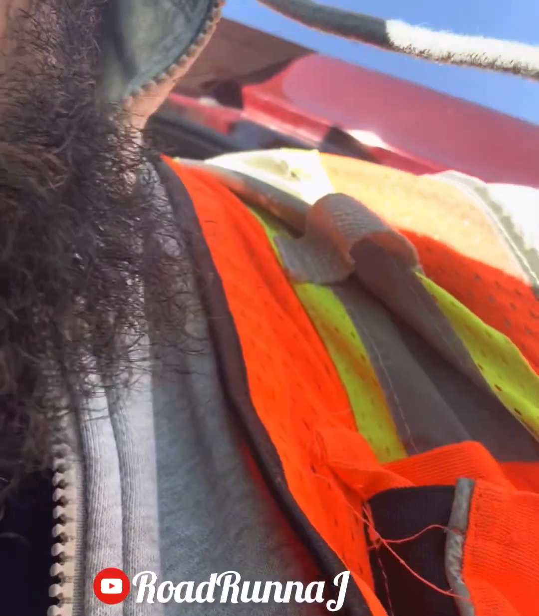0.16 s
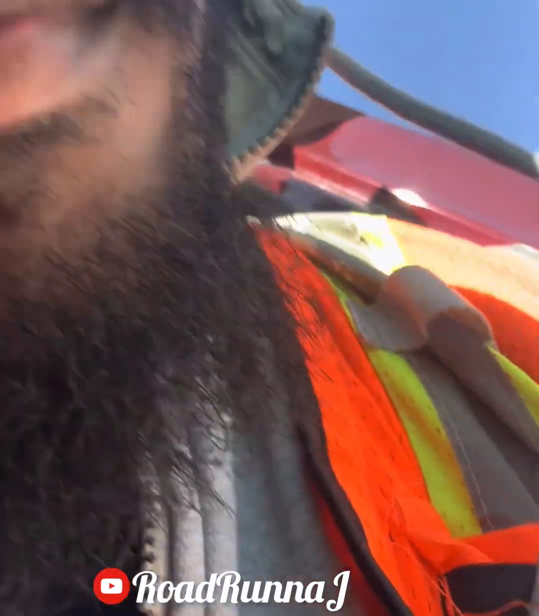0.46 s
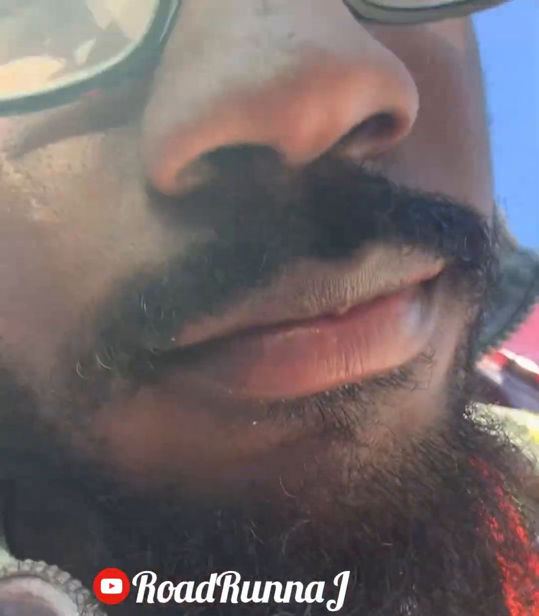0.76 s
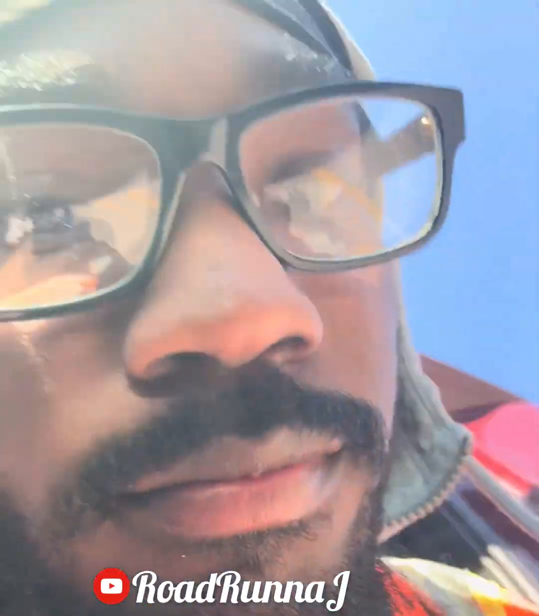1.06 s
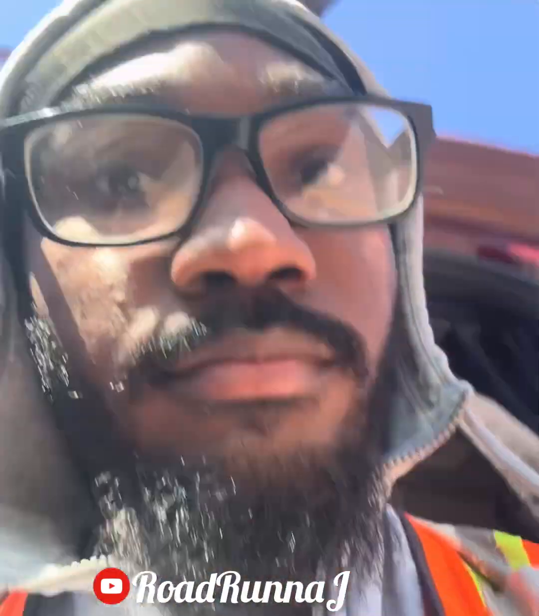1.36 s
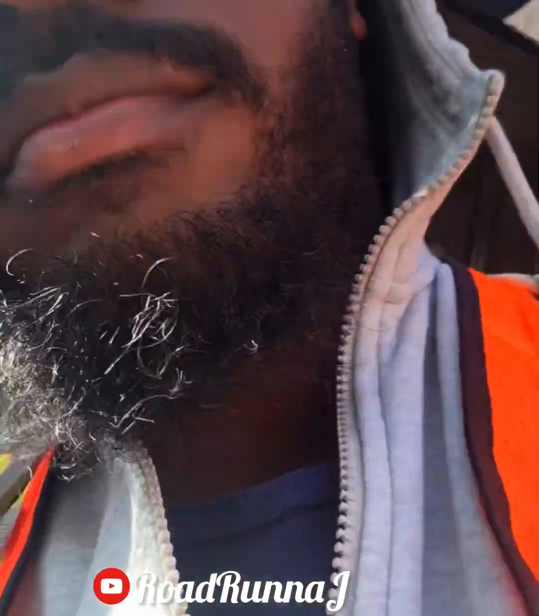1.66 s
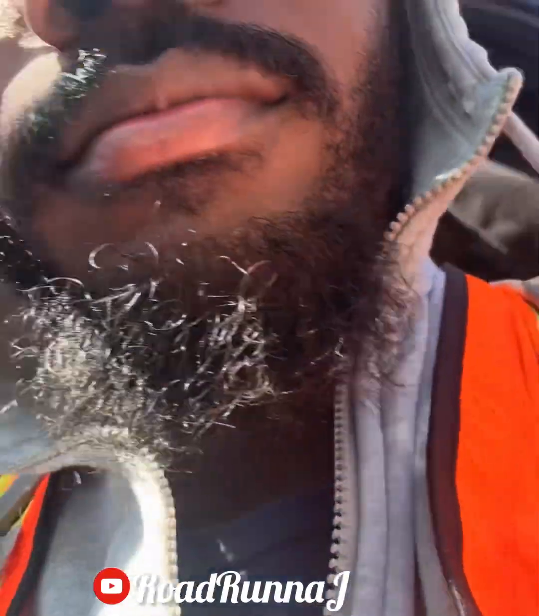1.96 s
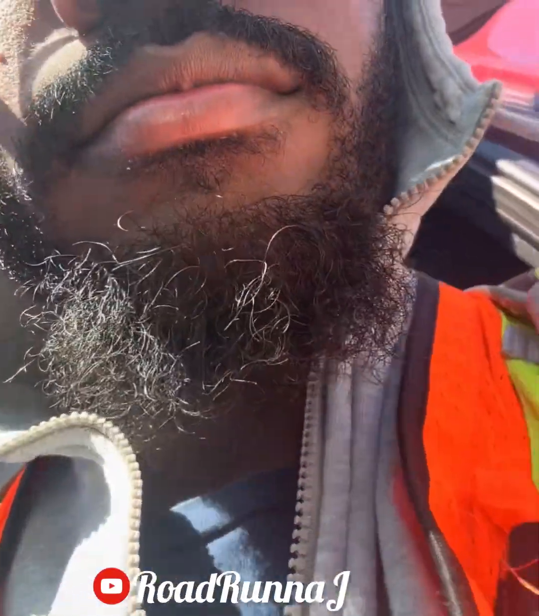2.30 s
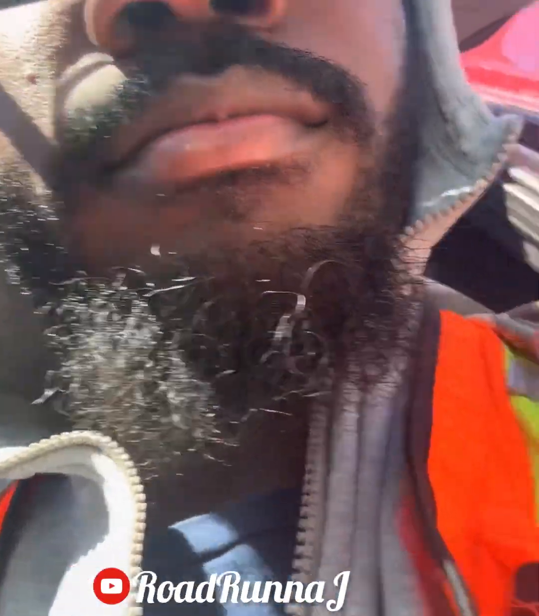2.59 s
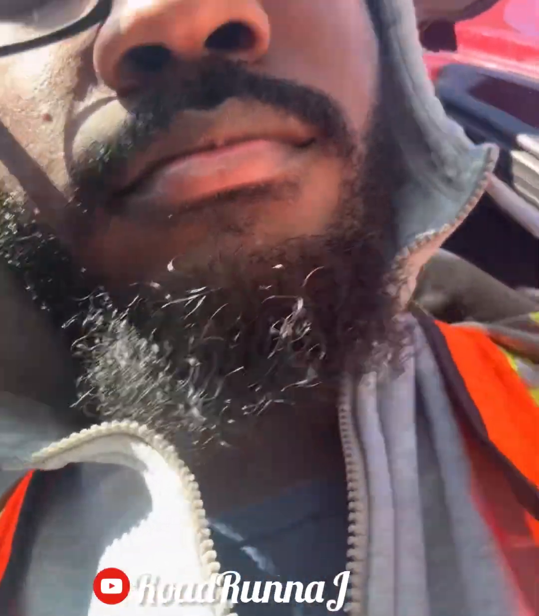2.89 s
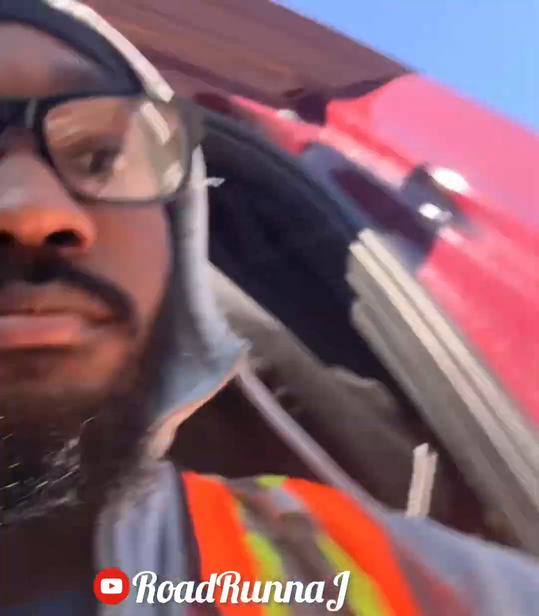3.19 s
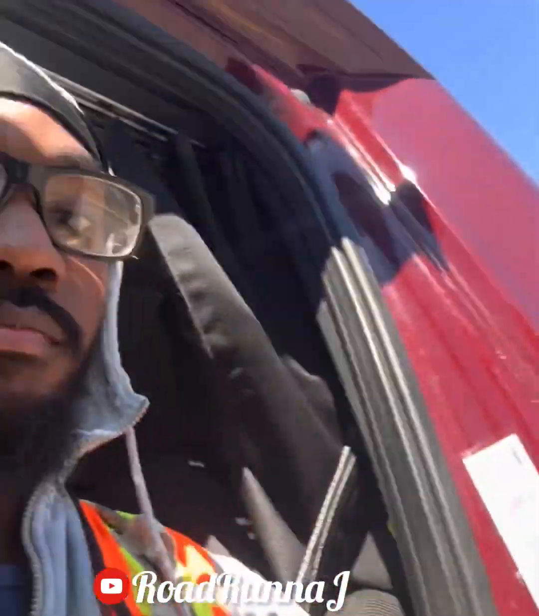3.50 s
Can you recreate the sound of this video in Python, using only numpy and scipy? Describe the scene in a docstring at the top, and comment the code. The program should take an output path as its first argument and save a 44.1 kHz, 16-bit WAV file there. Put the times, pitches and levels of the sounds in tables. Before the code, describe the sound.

A large diesel truck engine idles close by outdoors, with steady low throb, hum and rattly knocking; a hand-held phone shifts its tone and picks up brief bumps and ticks.

```python
"""A six-cylinder truck diesel idles at 600 rpm, heard from beside the open cab door on a hand-held phone.
From the start, sinusoids locked to the crank give exhaust throb and belt-driven hum over a filtered-noise rumble.
Above them, decaying noise bursts make cylinder knock, a pump's chatter and loose clatter, coloured by the block.
The tone shifts throughout as the phone moves; its balance between the ears changes near 1.2 s and 3.1 s.
Handling adds soft gliding bumps near 1.6 s and 2.7 s, and dry noise ticks near 2.7 s and 3.3 s."""
import sys
import numpy as np
from scipy import signal
from scipy.fft import rfft, irfft
from scipy.io import wavfile
from scipy.ndimage import map_coordinates

SR = 44100
rng = np.random.default_rng(int(sys.argv[2]) if len(sys.argv) > 2 else 0)


def to_wav(sig):
    """Store sig (one row per channel, or 1-D mono) as 16-bit WAV at the path in sys.argv[1].

    Samples outside -1..1 are clipped; the rate is SR.
    """
    pcm = np.clip(np.atleast_2d(sig), -1, 1) * 32767
    pcm = np.round(pcm).astype(np.int16)
    wavfile.write(sys.argv[1], SR, pcm.T)  # frames by channels


N = 160965

CRANK_HZ, CYLINDERS = 10.003, 6
STEADY_BELOW_HZ = 280  # the phone's movement leaves engine-block sound below this unchanged in level
TREBLE_HZ = 2950  # the treble clatter and the fine spectral ripple set in around here


def amp(db):
    """Level: 20 dB is a tenfold amplitude ratio."""
    return 10 ** (np.asarray(db) / 20)


def unit(x):
    """Normalization: scales a signal to rms 1."""
    return x / np.sqrt(np.mean(x ** 2) + 1e-20)


def colour(x, points):
    """Linear filtering: weights the spectrum by a curve through points of (Hz, dB)."""
    hz, db = np.transpose(points)
    f = np.fft.rfftfreq(len(x), 1 / SR)
    gain = amp(np.interp(np.log(f + 1), np.log(hz + 1), db))
    return irfft(rfft(x) * gain, len(x))


def contour(points):
    """Amplitude envelope: gain over time through points of (s, dB)."""
    return amp(np.interp(np.arange(N) / SR, *np.transpose(points)))


def drift(rate_hz):
    """Low-pass noise: slow random wandering of zero mean and rms 1."""
    f = np.fft.rfftfreq(N, 1 / SR)
    lowpass = np.exp(-(f / rate_hz) ** 2) * (f > 0)
    return unit(irfft(rfft(rng.standard_normal(N)) * lowpass, N))


def add(mix, s, sound):
    """Superposition: adds a sound to the mix at a time in seconds."""
    part = mix[round(s * SR):][:len(sound)]
    part += sound[:len(part)]


def tone(turns, db, waver):
    """Narrow-band modulation: a sinusoid whose in-phase and quadrature parts waver slowly."""
    angle = 2 * np.pi * (turns + rng.random())
    in_phase = (1 + waver * drift(2.8)) * np.cos(angle)
    quadrature = waver * drift(1.6) * np.sin(angle)
    return np.sqrt(2) * amp(db) * (in_phase + quadrature)


def exhaust(crank):
    """Engine orders: tones at fixed multiples of crank speed, over a rumble of low noise."""
    # Throb. Each row: multiple of the crank speed, rms level in dB before the bass contour.
    orders = [(3, -35.5), (4.5, -32.7), (6, -23.5), (7.5, -40.5), (8.5, -36.5), (9, -27.5), (10.5, -37),
              (12, -37.5), (23, -43), (24, -40.5), (27, -41)]
    # Rumble spectrum. Each row: frequency in Hz, relative density in dB per Hz.
    rumble_spectrum = [(15, -32), (36, -20), (54, -4.5), (82, -1.5), (105, -6), (140, -7.8), (185, -6),
                       (220, -5), (275, -8.5), (330, -14), (600, -88)]
    # Bass contour. Each row: time in seconds, gain in dB.
    bass_level = [(0, -1.1), (.45, 2.1), (0.9, 1.5), (1.3, -0.3), (1.9, -0.1), (2.45, 0.2), (3.1, 0.3),
                  (3.65, -1.5)]
    throb = sum(tone(order * crank, db, waver=.06) for order, db in orders)
    rumble = amp(-26.5) * unit(colour(rng.standard_normal(N), rumble_spectrum))
    return (throb + rumble) * contour(bass_level)


def hum(crank):
    """Fixed drive ratios: tones of belt-driven parts and gears follow the crank; the low ones swell and sink."""
    # Hum tones. Each row: mean frequency in Hz, rms level in dB before any swell.
    hum_lines = [(56.4, -37), (76.8, -32.5), (122.3, -34.5), (244.6, -28), (366.8, -37), (420.1, -34.5),
                 (720.1, -40), (870.1, -40), (945, -39), (1080.3, -42.5), (1440.1, -42.5), (1470.5, -49.5)]
    # Swell of the low tones. Each row: time in seconds, gain in dB.
    hum_level = [(0, -2.5), (0.4, -1), (0.8, 1.5), (1.2, 2.5), (1.6, -1), (2.4, -0.5), (2.9, 1.5),
                 (3.25, -1), (3.65, -1)]
    swell = contour(hum_level)
    total = 0
    for hz, db in hum_lines:
        line = tone(hz * crank / CRANK_HZ, db, waver=.09)
        total = total + line * (swell if hz < STEADY_BELOW_HZ else 1)
    return total


def strokes(crank, revs, t60_s, count):
    """Periodic excitation: a round of decaying noise bursts, read at the crank's pace, repeats every revs turns."""
    ring_rise_s = .003
    size = round(SR * revs / CRANK_HZ)
    t = np.arange(size) / SR
    fade = (1 - np.exp(-t / ring_rise_s)) * amp(-60 * t / t60_s)
    cycle = 0
    for k in range(count):
        burst = fade * rng.standard_normal(size)
        cycle = cycle + np.roll(burst, k * size // count)
    position = crank / revs % 1 * size
    return unit(map_coordinates(cycle, [position], order=3, mode="grid-wrap"))


def clatter(firings):
    """Amplitude-modulated noise: each firing shakes out a fresh burst of hiss and tiny impacts, over a steady bed."""
    t60_s, rise_s = 0.11, 0.0046
    bed, spread_db = 0.78, 3  # steady share of the envelope; spread of burst strength
    grains_per_s, grain_spread_db, grain_db = 700, 3, -10
    since = firings % 1 / (CRANK_HZ * CYLINDERS / 2)  # seconds since the last firing
    strength = amp(spread_db * rng.standard_normal(200))[np.floor(firings).astype(int)]
    burst = unit(strength * (1 - np.exp(-since / rise_s)) * amp(-60 * since / t60_s))
    sizes = amp(grain_spread_db * np.minimum(rng.exponential(1, (2, N)), 4))
    struck = rng.random((2, N)) < grains_per_s / SR
    grains = sizes * rng.choice([-1, 1], (2, N)) * struck
    hiss = rng.standard_normal((2, N))
    return unit((bed + (1 - bed) * burst) * (hiss + amp(grain_db) * unit(grains)))


def ringing(x):
    """Modal resonance: peaks and one gap of block and cab, with a random treble ripple for many small modes."""
    # Block and cab modes. Each row: centre in Hz, half-width to 1/e of the dB peak in Hz, height in dB.
    resonances = [(457, 14, 1.5), (1050, 56, 2), (1466, 21, 5), (1940, 50, 1.5), (2180, 70, 2),
                  (2330, 47, -10.5), (2377, 43, 3.5), (2930, 49, 0), (3218, 52, 4.5), (3454, 63, 4)]
    ripple_db, ripple_hz = 4, 45.34  # rms depth well into the treble, spacing
    f = np.fft.rfftfreq(N, 1 / SR)
    grid = np.arange(0, SR, ripple_hz)
    ripple = np.interp(f, grid, rng.standard_normal(len(grid)))
    ripple = ripple * f ** 2 / (f ** 2 + TREBLE_HZ ** 2)
    peaks = sum(db * np.exp(-((f - hz) / width) ** 2) for hz, width, db in resonances)
    return irfft(rfft(x) * amp(ripple_db * ripple + peaks), N)


def block(crank):
    """Source and filter: knock, a pump stroking three times per engine cycle and clatter sound through the block."""
    # Excitation. Each row: frequency in Hz, relative level of knock, pump and clatter in dB.
    drive = np.array([(305, -8.5, -17, -0.5), (520, -7.5, -13.5, -1), (850, -6, -7.5, -4),
                      (1580, -8.5, -8.5, -0.5), (3270, -16.5, -21, 0.6), (9000, -25, -30, -1)])
    # Sound common to both ears. Each row: frequency in Hz, relative density in dB per Hz.
    common_spectrum = [(160, -34), (290, -3.5), (335, -5.5), (380, 0.3), (540, -4.5), (620, -7), (800, -5),
                       (1050, -7), (1300, -8.5), (1600, -12), (1950, -9.5), (2500, -14.5), (3300, -20),
                       (3750, -23), (5950, -32.5), (6800, -40.5), (7800, -75), (9200, -39.5),
                       (12700, -45.5), (14200, -47)]
    # Sound of opposite sign at the two ears. Each row: frequency in Hz, relative density in dB per Hz.
    side_spectrum = [(60, -50), (120, -29), (275, -10), (450, -4.2), (523, 1), (620, -4), (729, -3),
                     (803, -6.5), (1030, -0.5), (1720, -7.5), (1950, -9.5), (2200, -12), (2500, -7.3),
                     (3740, -20.5), (6980, -29), (8310, -23.5), (10500, -36), (12000, -59), (14300, -31)]
    treble_lead_s = 0.0038  # treble clatter bursts come this much earlier
    f = np.fft.rfftfreq(N, 1 / SR)
    treble = 1 - 1 / (1 + (f / TREBLE_HZ) ** 6)  # power share
    body = rfft(clatter(crank * CYLINDERS / 2)) * np.sqrt(1 - treble)
    early_crank = crank + treble_lead_s * CRANK_HZ
    ticking = rfft(clatter(early_crank * CYLINDERS / 2)) * np.sqrt(treble)
    paths = []
    for loose, spectrum, db in zip(irfft(body + ticking, N), (common_spectrum, side_spectrum), (-18.5, -26)):
        knock = strokes(crank, 2, t60_s=0.25, count=CYLINDERS)
        pump = strokes(crank, 2 / 3, t60_s=.8, count=1)
        shaking = sum(colour(x, drive[:, [0, k + 1]]) for k, x in enumerate((knock, pump, loose)))
        paths.append(amp(db) * unit(ringing(colour(shaking, spectrum))))
    mid, side = paths
    return np.array([mid + side, mid - side])


def shifting(pair):
    """Time-varying filtering: broad bands swell, sink and flutter as the phone moves, above steady lows."""
    # Band contours, each rescaled to rms gain 1.
    # Each row: time in seconds, relative level of five bands from low mids to treble in dB.
    band_levels = [(0.0, -21.5, -27.5, -24, -25, -31.5), (0.4, -23.7, -29, -24, -22.5, -31.5),
                   (0.8, -25.2, -27.6, -23.5, -24.5, -30.5), (1.25, -28.3, -27.4, -25, -23.5, -31),
                   (1.55, -25.5, -27, -26, -24.5, -31.5), (1.85, -22, -27.5, -23, -27.5, -33),
                   (2.15, -23.8, -28, -24.5, -25.5, -33), (2.45, -21.5, -28, -25.6, -26, -30),
                   (2.75, -25, -27.5, -24.5, -26, -33), (3.0, -24.5, -28.5, -23.5, -23.5, -32.5),
                   (3.2, -34.5, -25.5, -27, -26, -32.5), (3.45, -27, -26, -26, -23.5, -31),
                   (3.65, -28, -24.7, -24.5, -24, -30)]
    # Centres of those five overlapping bands in Hz.
    band_hz = [430, 660, 1100, 2050, 4500]
    flutter_db, flutter_hz = 0.62, 8.1
    s, *levels = np.transpose(band_levels)
    t, f = np.arange(N) / SR, np.fft.rfftfreq(N, 1 / SR)
    gains = [1]  # the steady lows
    for db in levels:
        gains.append(unit(amp(np.interp(t, s, db) + flutter_db * drift(flutter_hz))))
    spectrum, out = rfft(pair), 0
    knots = np.log([STEADY_BELOW_HZ, *band_hz])
    for weights, gain in zip(np.eye(len(gains)), gains):
        band = irfft(spectrum * np.interp(np.log(f + 1), knots, weights), N)
        out = out + gain * band
    return out


def swelling(pair):
    """Passing resonance: narrow doorway modes, equal at both ears, swell or sink as the phone passes through."""
    # Doorway modes. Each row: middle in seconds, length in seconds, centre in Hz,
    # half-width to 1/e in Hz, greatest gain in dB.
    swells = [(0.38, 0.18, 303, 35, 9.5), (0.15, 0.5, 500, 50, -2.5), (0.42, 0.84, 920, 50, 3.5),
              (0.65, 0.2, 510, 50, 1), (0.85, 0.57, 1990, 100, 4), (0.85, 0.55, 2400, 80, 5.5),
              (1.83, 0.46, 445, 55, 2.5), (2.638, 0.2, 400, 40, 3), (2.85, 0.35, 620, 45, -4),
              (3.3, 0.36, 710, 60, 5.5), (3.42, 0.55, 322, 40, -5), (3.52, 0.47, 1460, 160, -4)]
    t, f = np.arange(N) / SR, np.fft.rfftfreq(N, 1 / SR)
    common = rfft(pair.mean(0))
    for s, length, hz, width, db in swells:
        near = np.exp(-(2 * (t - s) / length) ** 4)
        band = irfft(common * np.exp(-((f - hz) / width) ** 2), N)
        pair = pair + (amp(db * near) - 1) * band
    return pair


def leaning(pair):
    """Interaural level difference: each phone position favours one ear or the other, band by band."""
    # Left minus right. Each row: frequency in Hz, difference at the first, second and third position in dB.
    lean = np.array([(290, 0, -0.7, -1), (400, 0.4, 1.5, 3), (490, 6.5, -1, -3), (560, 0, -6.5, -2),
                     (720, -4.5, -5.5, 0.5), (860, -2.5, 0, -1), (1000, 1, 7, 4), (1140, -0.5, 6.5, 6),
                     (1350, -1, 0, 0), (1900, -0.4, 0.2, -1), (8000, -0.5, -1, 0)])
    # Start and end of the first move, then of the second, in seconds.
    moves_s = [0.95, 1.45, 2.95, 3.25]
    position = np.interp(np.arange(N) / SR, moves_s, [0, 1, 1, 2])
    out = 0
    for k, db in enumerate(lean.T[1:]):
        ears = [colour(x, np.c_[lean[:, 0], sign * db / 2]) for x, sign in zip(pair, (1, -1))]
        out = out + np.maximum(1 - abs(position - k), 0) * np.array(ears)  # crossfade
    return out


def handling():
    """Transients: bumps are gliding sinusoids in a short window, ticks are decaying band-limited noise."""
    # Bumps. Each row: start in seconds, starting pitch in Hz, envelope peak in dB, length in seconds,
    # glide by the end as a share of the pitch.
    bumps = [(1.594, 202, -2.8, 0.038, -0.24), (1.616, 94, -11.5, 0.1, -0.25),
             (2.703, 84, -11, 0.063, -0.08), (2.723, 373, -16.5, 0.024, 0.084),
             (2.771, 507, -15.5, 0.04, 0.15)]
    # Ticks. Each row: start in seconds, centre in Hz, half-width to -6 dB in octaves,
    # rms level of the noise before its envelope in dB.
    ticks = [(2.693, 2090, 0.58, -10), (3.280, 1300, 0.8, -11.5)]
    bump_skew = 0.85  # below 1 the window peaks early
    tick_t60_s, tick_rise_s = 0.04, .0015
    out = np.zeros(N)
    for s, hz, db, length, glide in bumps:
        t = np.arange(0, length, 1 / SR)
        window = np.sin(np.pi * (t / length) ** bump_skew) ** 2
        turns = hz * t * (1 + glide * t / length / 2)
        add(out, s, -amp(db) * window * np.sin(2 * np.pi * turns))
    t = np.arange(4096) / SR
    for s, hz, octaves, db in ticks:
        shape = [(f, -6 * (np.log2(f / hz) / octaves) ** 2) for f in np.geomspace(100, 16000, 24)]
        envelope = (1 - np.exp(-t / tick_rise_s)) * amp(db - 60 * t / tick_t60_s)
        add(out, s, envelope * unit(colour(rng.standard_normal(len(t)), shape)))
    return out


def scene():
    """Phase locking: one crank angle, in slightly wandering turns, drives every engine part."""
    speed_wander, first_firing_s = 0.00068, .015  # rms share of the speed; when the crank passes zero
    speed = 1 + speed_wander * drift(2.37)
    crank = CRANK_HZ * (np.cumsum(speed) / SR - first_firing_s)
    engine = swelling(shifting(block(crank))) + exhaust(crank) + hum(crank)
    return leaning(engine + handling())


def record(dry):
    """Clipping and band limitation: the phone clips at full scale, then low-passes."""
    cutoff_hz = 14500
    lowpass = signal.firwin(511, cutoff_hz, window=("kaiser", 9), fs=SR)
    return signal.oaconvolve(np.clip(dry, -1, 1), lowpass[None], "same")


dry = scene()
out = record(dry)
to_wav(out)
```